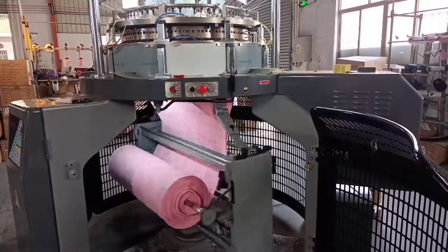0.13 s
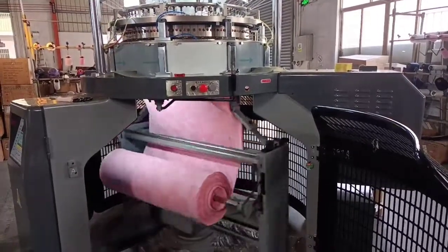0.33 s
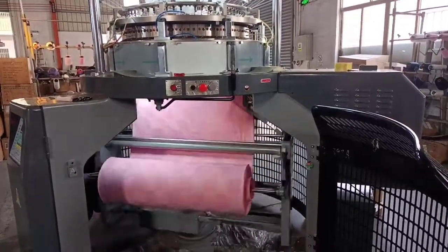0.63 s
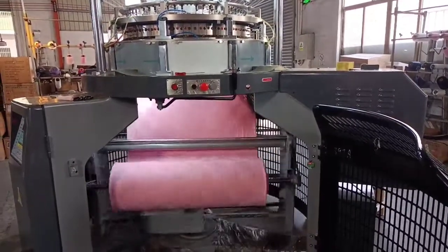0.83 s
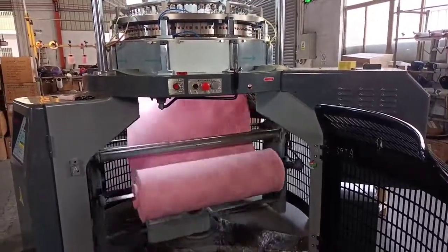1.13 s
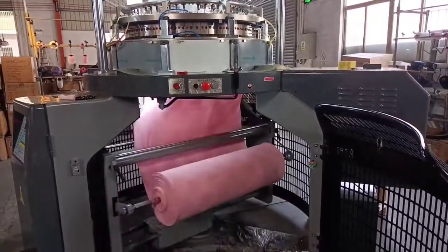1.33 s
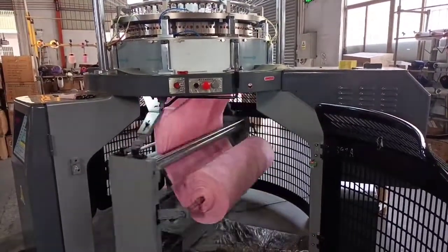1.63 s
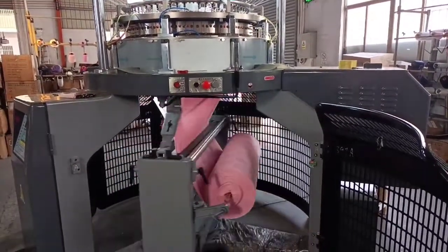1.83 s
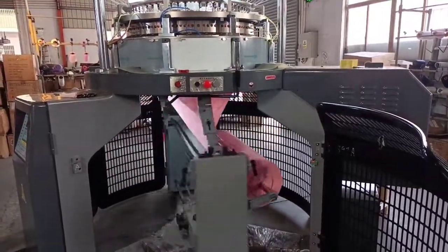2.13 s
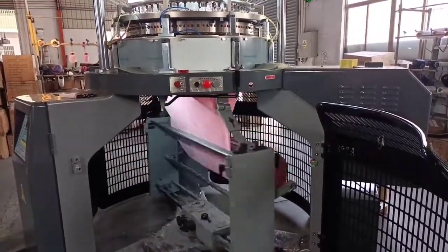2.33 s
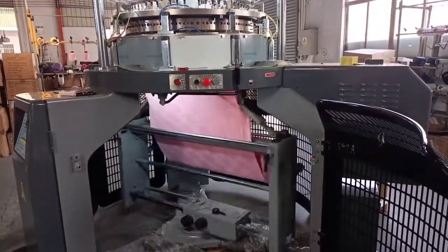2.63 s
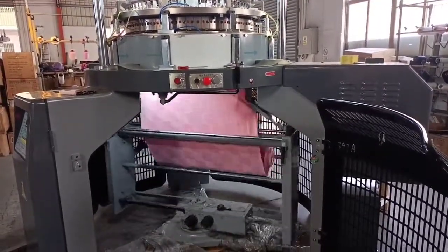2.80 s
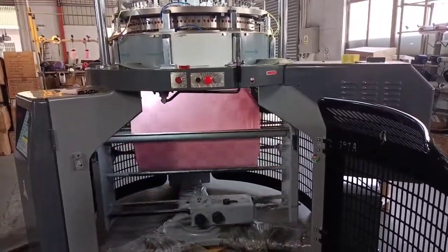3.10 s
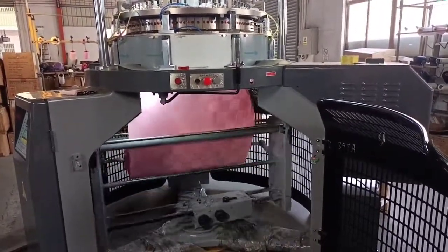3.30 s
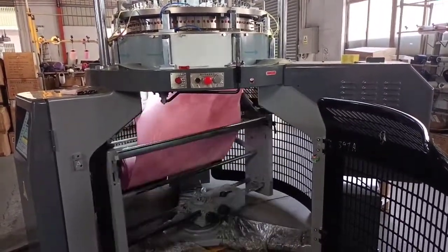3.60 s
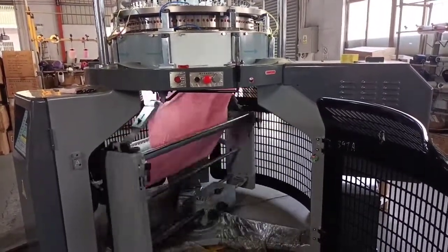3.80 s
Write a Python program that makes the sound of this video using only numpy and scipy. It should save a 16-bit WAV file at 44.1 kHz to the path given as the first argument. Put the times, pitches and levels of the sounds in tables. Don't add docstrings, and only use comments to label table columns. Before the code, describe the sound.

Squealing whirr of a large circular knitting machine, its pitch sagging and jumping over steady hiss.

```python
import sys
import numpy as np
from scipy import signal
from scipy.fft import rfft, irfft
from scipy.io import wavfile
from scipy.ndimage import uniform_filter1d

SR = 44100
rng = np.random.default_rng(int(sys.argv[2]) if len(sys.argv) > 2 else 0)


def how_loud(loudness_db):
    steps = np.asarray(loudness_db, float) / 20
    return 10 ** steps


def master(y):
    cut = np.clip(np.atleast_2d(y).T, -1, 1)
    pcm = np.round(cut * 32767)
    wavfile.write(sys.argv[1], SR, pcm.astype(np.int16))


N = 174195


def rms_one(x):
    return x / np.sqrt(np.mean(x ** 2) + 1e-20)


def drift(rate_hz):
    hop = 40
    pole = np.exp(-2 * np.pi * rate_hz * hop / SR)
    white = rng.standard_normal(N // hop + 2002)
    slow = signal.lfilter([1], [1, -2 * pole, pole * pole], white)[2000:]
    return np.interp(np.arange(N) / hop, np.arange(len(slow)), rms_one(slow))


def bump(t, mid_s, length_s):
    return np.exp(-(2 * (t - mid_s) / length_s) ** 2)


def band(x, low_hz, high_hz):
    hz = np.fft.rfftfreq(N, 1 / SR)
    beyond = np.maximum(np.maximum(low_hz - hz, hz - high_hz), 0)
    skirt_hz = 60
    return irfft(rfft(x) * how_loud(-20 * np.minimum(beyond / skirt_hz, 10) ** 1.5), N)


def banded(white, spectrum, patchy_db, rate_hz):
    out, together = 0, drift(0.34)
    spectrum_hz, spectrum_db = np.transpose(spectrum)
    edges = 20 * 2 ** np.arange(0, 9.6, .5)
    for k, (low, high) in enumerate(zip(edges, edges[1:])):
        mid = np.sqrt(low * high)
        level = np.interp(np.log(mid), np.log(spectrum_hz), spectrum_db, left=-60, right=-60)
        sos = signal.butter(2, [low, high], "band", fs=SR, output="sos")
        part = signal.sosfilt(sos, white[k % 2])
        out = out + part * how_loud(level + patchy_db * (1.96 * together + drift(rate_hz)))
    return rms_one(out)


def cells(x, share, size):
    z = signal.stft(x, nperseg=1024)[2]
    keep = rng.random((len(z) // size + 1, z.shape[1] // 3 + 1)) < share
    keep = np.repeat(np.repeat(keep, size, axis=0), 3, axis=1)
    keep = keep[:len(z), :z.shape[1]]
    return signal.istft(z * keep, nperseg=1024)[1][:N]


# start_s, pitch_hz
SQUEAL_PITCH = [(0, 993), (.4, 925), (.625, 918), (.76, 1062), (.93, 993), (1.25, 975), (1.33, 1024),
                (1.8, 916), (1.92, 919), (2.05, 1046), (2.14, 974), (2.575, 950), (2.67, 1016), (2.89, 919),
                (3.08, 936), (3.45, 912), (3.54, 1004), (3.7, 942)]
# mid_s, length_s, bend_hz
FABRIC_TUGS = [(.13, .12, 12), (.28, .16, -14), (.65, .06, -14), (.81, .06, 9), (1.295, .05, 12),
               (1.66, .2, -8), (1.99, .1, -24), (2.63, .05, 20), (2.675, .04, -9), (2.72, .06, 9),
               (3.19, .12, 9), (3.29, .14, -11), (3.63, .1, -22)]
# start_s, level_db, brightness_db_per_octave, fundamental_db
ROLLER_PRESSURE = [(.05, -34.5, 1.5, 1), (.22, -38.5, 5.5, 1), (.5, -37.5, -3.5, 7), (.75, -30, 6, -4),
                   (.95, -29.5, -6.5, 3.5), (1.12, -30.5, -9, -14), (1.47, -28, -2.5, -1),
                   (1.7, -32.5, -4, -11), (1.85, -39, 6.5, 4.5), (2.05, -26, 6.5, 1), (2.15, -30, -2, -9),
                   (2.33, -27, -2, -7.5), (2.52, -35.5, 4, 2.5), (2.7, -31.5, -9.5, -2.5),
                   (2.9, -42, -2, 0), (3.15, -40, -2.5, -0.5), (3.6, -37, -5.5, -5), (3.95, -34, -8, 0.5)]
PARTIAL_LEVELS = [-10.5, 0, -5.5, 0.5, -50, -9.5, -16.5]
# pitch_hz, width_hz, lift_db
FRAME_RESONANCES = [(915, 24.3, 16), (948.7, 14, 9.5), (997, 12, 9.5), (3150, 140, -3), (4340, 230, -2.5),
                    (2110, 31, 1), (2845, 110, 3), (2917, 29, -9.5), (2918, 16, 12.5), (3610, 33, 0),
                    (3810, 68, 3.5), (6040, 94, 6.5), (6450, 150, 6.5), (6678, 104, 14)]
# mid_s, length_s, change_db
GRIP_CATCHES = [
    [(.14, .1, 6), (.5, 0.068, -7), (.6, 0.15, -1.5), (.95, 0.11, -4), (1.07, .08, -6), (1.66, .14, 5),
     (1.82, .07, 4), (2.0, 0.092, -9), (2.46, .12, 4.5), (2.92, .1, -14), (3.35, .08, 3), (3.44, 0.071, -5),
     (3.92, 0.11, 5)],
    [(0, 0.065, -11), (.065, 0.039, 8), (.44, 0.059, 0), (.52, 0.065, -10), (1.1, 0.092, 4.5),
     (1.24, 0.094, -2), (1.63, 0.14, -2.5), (1.81, .05, -6), (2.32, 0.2, 3), (2.72, 0.14, 0.5),
     (3.17, .08, 3), (3.36, 0.15, -6), (3.62, 0.13, 6)],
    [(.26, 0.16, 5.5), (.44, 0.11, -14), (.58, .12, 6.5), (.76, .2, -7), (1.52, 0.063, -2), (1.8, .06, 7),
     (2.0, .15, 0), (2.44, 0.14, -3.5), (2.64, 0.11, -10), (3.0, 0.17, 7), (3.16, .06, 10),
     (3.86, .15, 1.5)],
    [(.1, 0.33, -5.5), (.47, 0.064, 8), (.77, 0.18, -11), (1.1, 0.087, 2), (1.6, 0.27, -4),
     (1.86, 0.043, 4.5), (2.04, 0.064, -7.5), (2.28, .06, 6), (2.42, 0.078, -6), (2.5, 0.041, 5.5),
     (3.9, .08, 1)],
    [],
    [(.8, .15, -7), (2.05, .1, -7), (2.3, .2, -12), (2.7, .15, 9)],
    [(.5, .4, 6.5), (1.25, .08, 14), (2.26, .1, -20), (2.35, 0.054, 9), (2.48, 0.049, -19),
     (2.55, .06, 8.5), (3.05, 0.27, 4), (3.7, .08, 8), (3.93, 0.061, 10)],
]


def squeal():
    t = np.arange(N) / SR
    hz = uniform_filter1d(np.interp(t, *np.transpose(SQUEAL_PITCH)), size=900)
    for mid_s, length_s, bend_hz in FABRIC_TUGS:
        hz = hz + bend_hz * bump(t, mid_s, length_s)
    start_s, *columns = np.transpose(ROLLER_PRESSURE)
    pressure_db, tilt, fundamental_db = [np.interp(t, start_s, c) for c in columns]
    glide = np.abs(np.gradient(hz)) * SR / 1000
    wobble_hz, glide_rough_hz = 1.5, 5
    hz = hz + (wobble_hz + glide_rough_hz * uniform_filter1d(glide, size=6000)) * drift(20)
    phase = 2 * np.pi * np.cumsum(hz) / SR
    glide_loss_db, flutter_db, flutter_hz = 4.5, 1.2, 24

    out = 0
    for k, partial_db in enumerate(PARTIAL_LEVELS, 1):
        level = pressure_db + partial_db + tilt * np.log2(np.clip(k / 2, 1, 2))
        for at_hz, width_hz, lift_db in FRAME_RESONANCES:
            level += lift_db / (1 + (2 * (k * hz - at_hz) / width_hz) ** 2)
        level -= glide_loss_db * (k - 1) * glide
        level += fundamental_db * (k == 1)
        level += flutter_db * (.5 + abs(k - 2) ** .5) * drift(flutter_hz)
        for mid_s, length_s, change_db in GRIP_CATCHES[k - 1]:
            level += change_db * bump(t, mid_s, length_s)
        out = out + np.sqrt(2) * how_loud(level) * np.sin(k * phase + 6.7 * rng.random())
    return out


# start_s, pitch_hz, level_db
MOTOR_LOAD = [(0, 203, -46), (.2, 203, -33), (.4, 202, -39.5), (.62, 203, -32.5), (.9, 204, -52),
              (1.08, 205, -39), (1.25, 204, -36), (1.5, 202, -40), (1.75, 202, -36), (2.1, 202, -34),
              (2.3, 201, -42), (2.5, 201, -37.5), (2.95, 203, -42), (3.25, 203, -31.5), (3.45, 202, -38),
              (3.7, 201, -34), (3.95, 201, -41.5)]
# start_s, pitch_hz, level_db
GEAR_MESH = [(0.0, 622, -37), (0.08, 614.3, -35), (1.04, 616.4, -42), (1.15, 612.3, -32.5),
             (1.35, 616.4, -43), (1.72, 618, -36.5), (1.73, 612.7, -47), (2.14, 611, -39),
             (2.88, 620.5, -41.5), (2.99, 625.9, -42.5), (3.05, 610, -31), (3.31, 618, -40),
             (3.49, 611, -45), (3.62, 627.5, -26), (3.83, 600, -43), (3.95, 619, -38)]
# start_s, pitch_hz, level_db
TAKE_UP_GEAR = [(0, 305, -56), (.35, 305, -46), (.48, 305, -33.5), (.62, 305, -45), (1.7, 303, -47),
                (1.85, 305, -38), (2.2, 308, -51), (2.38, 320, -34.5), (2.5, 320, -52), (2.85, 300, -43),
                (3.0, 302, -38.5), (3.35, 298, -40), (3.5, 300, -49), (3.95, 303, -48)]


def drive(rows):
    start_s, pitch_hz, level_db = np.transpose(rows)
    t = np.arange(N) / SR
    hz = np.interp(t, start_s, pitch_hz) + 1.46 * drift(6.13)
    level = np.interp(t, start_s, level_db) + 2.6 * drift(12)
    return np.sqrt(2) * how_loud(level) * np.sin(2 * np.pi * np.cumsum(hz) / SR)


# pitch_hz, level_db, width_hz
HUM_LINES = [(80.7, -55, 3), (155, -42, 5), (2012, -47, 5), (404, -45, 4), (428, -38, .7), (476, -47, 5),
             (503, -48, 5), (554, -47, 3), (1076, -48, 3), (1098, -51, 3), (1207, -45, 3), (1610, -51, 3),
             (2420, -51, 4)]


def hum():
    t, out = np.arange(N) / SR, 0
    for hz, level_db, width_hz in HUM_LINES:
        wander = 1.07 + 0.3 * width_hz ** .5 * (drift(width_hz) + 1j * drift(width_hz))
        line = np.real(wander * np.exp(2j * np.pi * hz * t))
        out = out + how_loud(level_db) * rms_one(line)
    return out


# pitch_hz, density_db_per_hz
NEEDLE_SPECTRUM = [(1000, -6), (1500, -3.5), (2400, 0), (3300, -1), (4200, 0), (5200, 0.5), (7000, -8),
                   (11000, -15)]


def needles():
    hits_per_s, spread_db = 9000, 0.55
    cam_hz, cam_depth = 31, 0.02
    sizes = how_loud(spread_db * np.minimum(rng.exponential(1, (2, N)), 5))
    sizes = sizes * rng.standard_normal((2, N))
    hits = sizes * (rng.random((2, N)) < hits_per_s / SR)
    throb = 1 + cam_depth * np.sin(2 * np.pi * cam_hz * np.arange(N) / SR)
    return how_loud(-28) * throb * banded(hits, NEEDLE_SPECTRUM, patchy_db=0.74, rate_hz=5.6)


# pitch_hz, density_db_per_hz
ROAR_SPECTRUM = [(15, -60), (25, -32), (199, -0.5), (356, 0), (422, -5), (510, -4), (615, 2.5), (867, -7),
                 (1500, -18.5), (1950, -56), (3300, -120)]


def roar():
    white = rng.standard_normal((2, N))
    return how_loud(-30.5) * banded(white, ROAR_SPECTRUM, patchy_db=-0.45, rate_hz=11)


def hall(x):
    t60_s, gap_s = 1.2, .012
    t = np.arange(SR) / SR
    tail = rng.standard_normal(SR) * how_loud(-60 * t / t60_s) * (t > gap_s)
    return signal.fftconvolve(x, tail / np.sqrt(np.sum(tail ** 2)))[:N]


def scene():
    tone = squeal()
    machine = drive(MOTOR_LOAD) + drive(GEAR_MESH) + drive(TAKE_UP_GEAR) + hum()
    return (tone + how_loud(-5) * hall(tone) + machine + needles() + roar())[None]


# start_s, length_s, level_db
FAINT_BURSTS = [(0.004, 0.074, -70), (0.104, 0.077, -60), (0.212, 0.035, -59), (0.303, 0.22, -54),
                (0.581, 0.028, -68), (0.724, 0.075, -57), (0.83, 0.036, -58), (0.982, 0.041, -64),
                (1.068, 0.038, -63), (1.129, 0.068, -64), (1.493, 0.047, -49), (1.576, 0.5, -59),
                (2.091, 0.041, -63), (2.218, 0.065, -59), (2.389, 0.059, -60), (2.474, 0.072, -55),
                (2.624, 0.22, -60), (2.836, 0.03, -58), (2.901, 0.052, -56), (2.984, 0.029, -60),
                (3.073, 0.26, -60), (3.368, 0.12, -66), (3.54, 0.051, -63), (3.606, 0.051, -61),
                (3.692, 0.15, -59), (3.86, 0.038, -58)]


def strips():
    t, gate = np.arange(N) / SR, np.zeros(N)
    low_hz, high_hz = 9720, 10470
    faint_db, swing, fade_s = -59.5, .3, 0.011
    for start_s, length_s, level_db in FAINT_BURSTS:
        level = faint_db + swing * np.clip(level_db - faint_db, -9, 3)
        to_edge = np.minimum(t - start_s, start_s + length_s - t)
        gate += how_loud(level) * np.clip(to_edge / fade_s + .5, 0, 1)
    white = rng.standard_normal((3, N))
    faint = cells(gate * rms_one(band(white[0], low_hz, high_hz)), 1 - .24, size=12)
    blips = cells(rms_one(band(white[2], 9000, low_hz)), .015, size=2)
    faint = band(faint + how_loud(-4) * gate.max() * blips, 8980, high_hz + 40)
    return faint + how_loud(-40.5) * rms_one(band(white[1], 11626, 12030))


def low_pass(x):
    return signal.sosfilt(signal.butter(12, 12420, fs=SR, output="sos"), x)


TREBLE_EDGES = [4770, 5860, 6890, 7680, 8520]
TREBLE_LEVELS = [-5.5, -0.5, -1, 0]
TREBLE_HOLES = [.07, .02, .06, .24]


def record(dry):
    spectrum = rfft(dry[0])
    step = np.searchsorted(TREBLE_EDGES[:-1], np.fft.rfftfreq(N, 1 / SR))
    x = irfft(spectrum * (step == 0), N)
    for k, (level_db, holes) in enumerate(zip(TREBLE_LEVELS, TREBLE_HOLES), 1):
        part = irfft(spectrum * (step == k), N)
        x = x + how_loud(level_db) * cells(part, 1 - holes, size=3)
    mix = (band(x, 20, 8500) + strips())[None]
    return low_pass(mix)


dry = scene()
out = record(dry)
master(out)
```